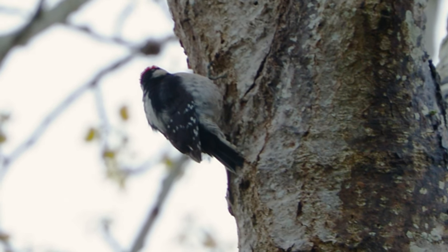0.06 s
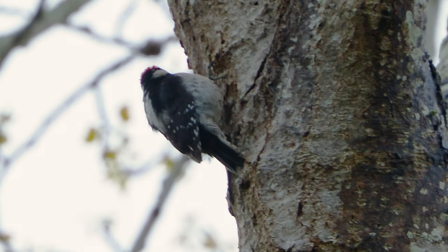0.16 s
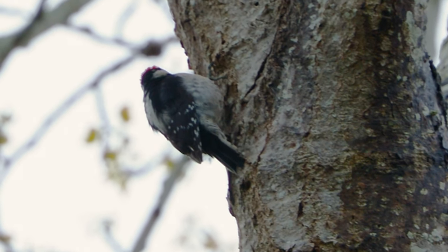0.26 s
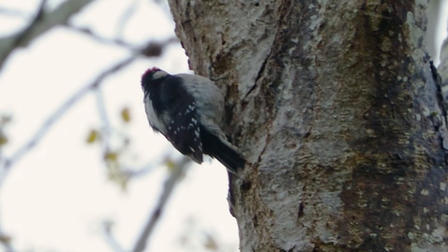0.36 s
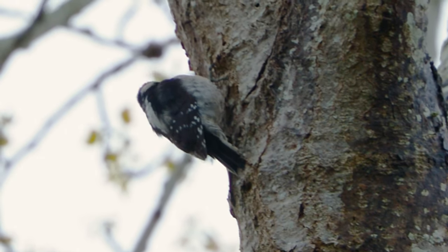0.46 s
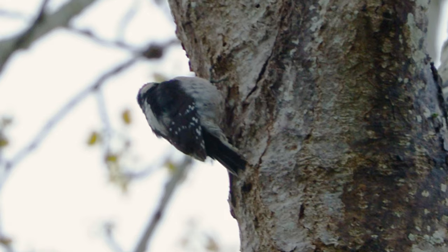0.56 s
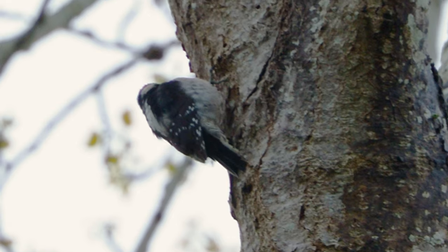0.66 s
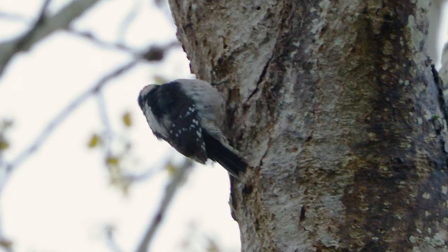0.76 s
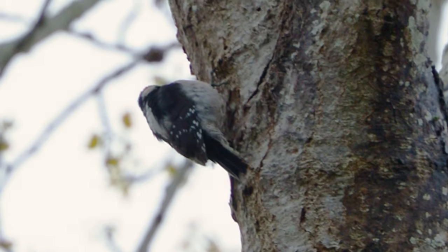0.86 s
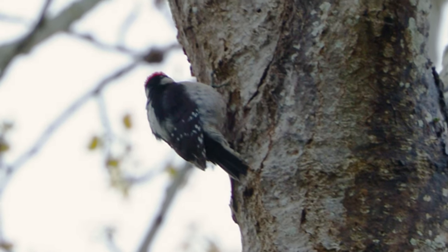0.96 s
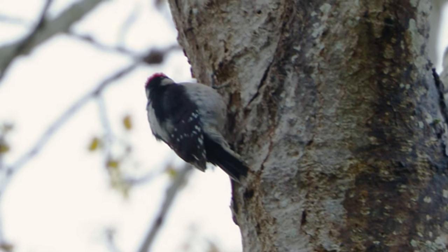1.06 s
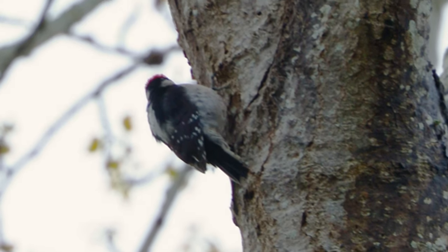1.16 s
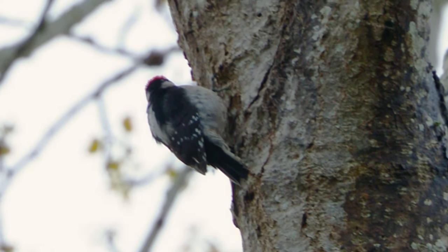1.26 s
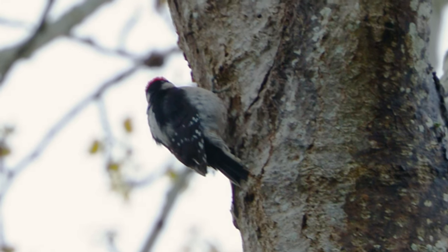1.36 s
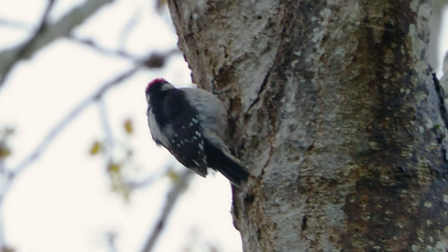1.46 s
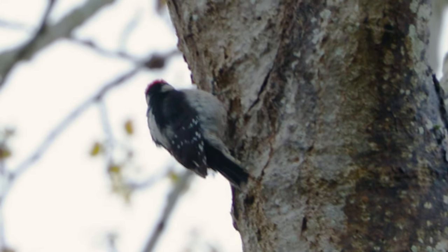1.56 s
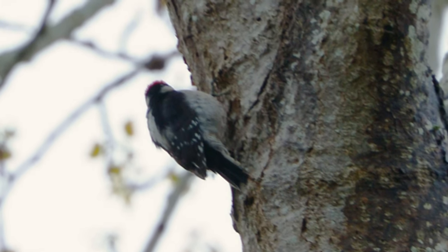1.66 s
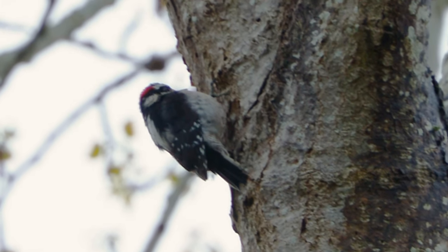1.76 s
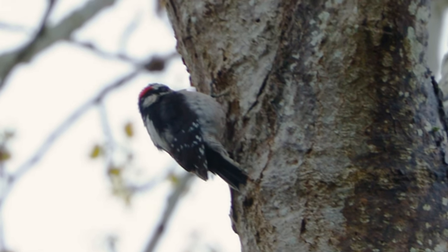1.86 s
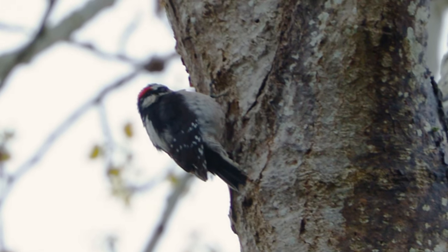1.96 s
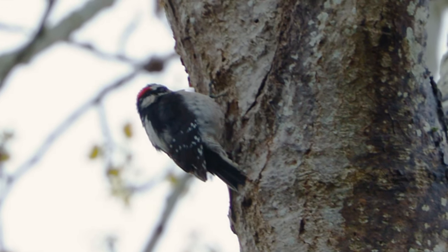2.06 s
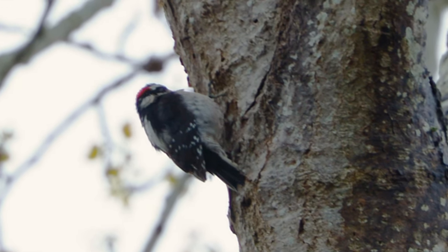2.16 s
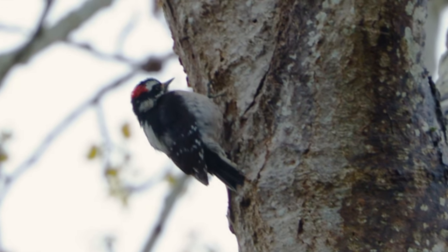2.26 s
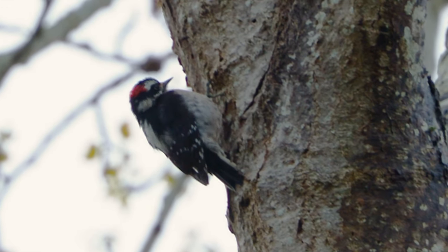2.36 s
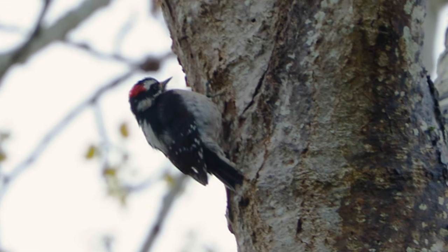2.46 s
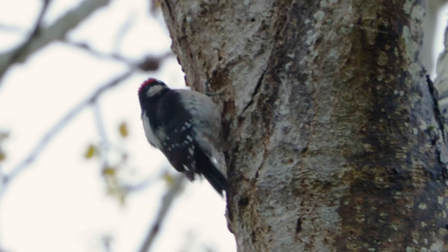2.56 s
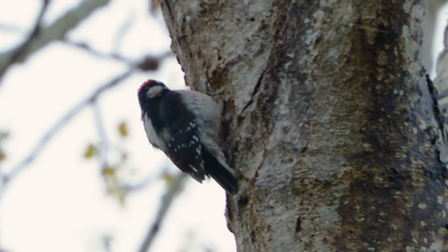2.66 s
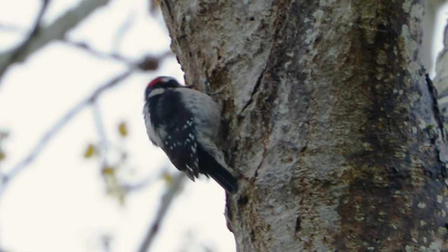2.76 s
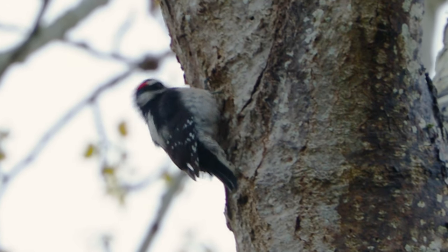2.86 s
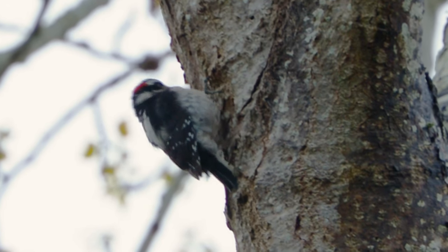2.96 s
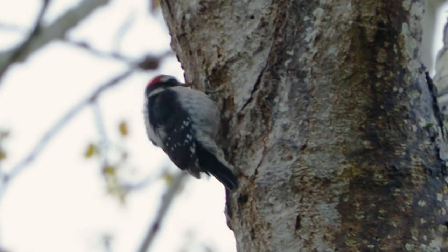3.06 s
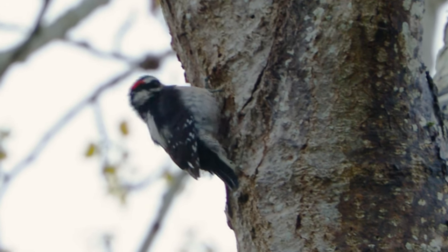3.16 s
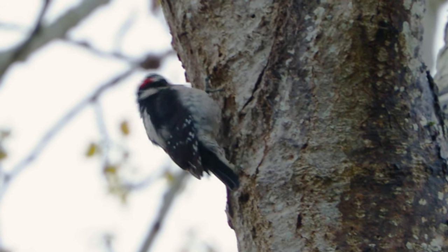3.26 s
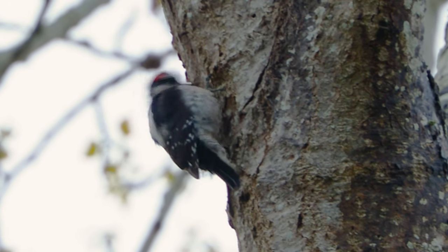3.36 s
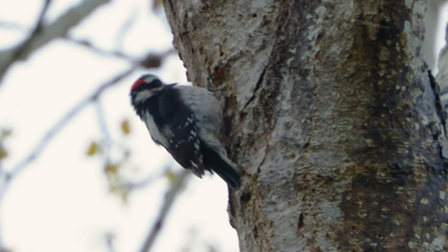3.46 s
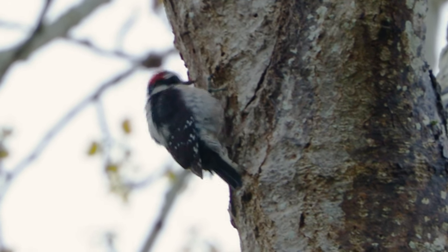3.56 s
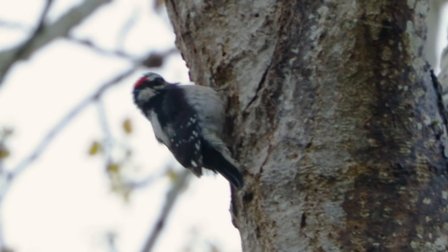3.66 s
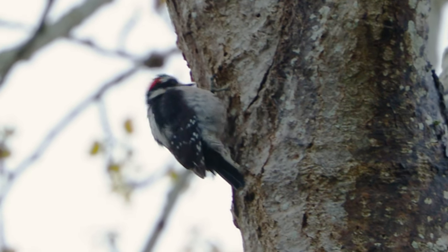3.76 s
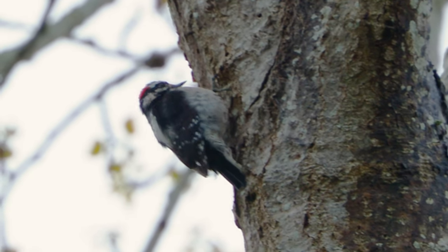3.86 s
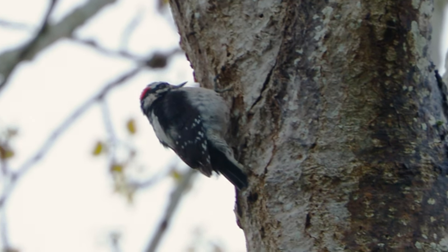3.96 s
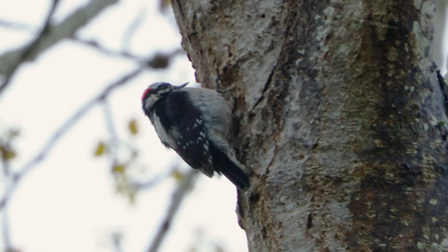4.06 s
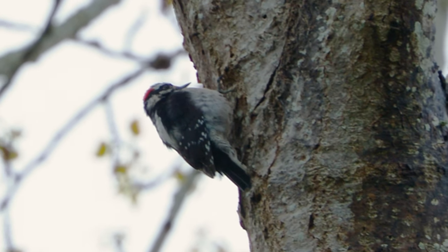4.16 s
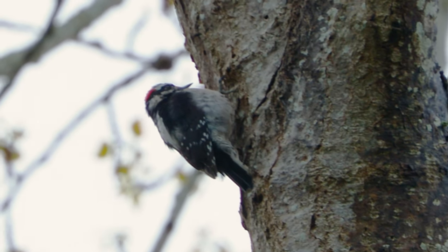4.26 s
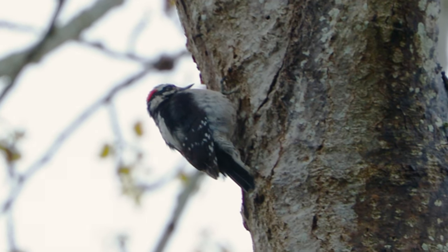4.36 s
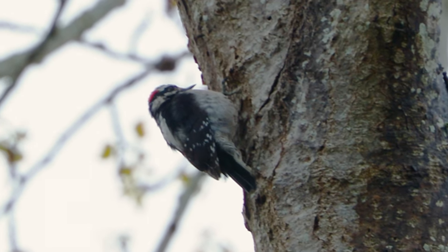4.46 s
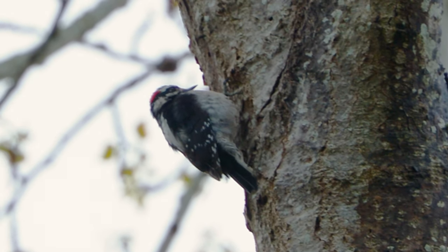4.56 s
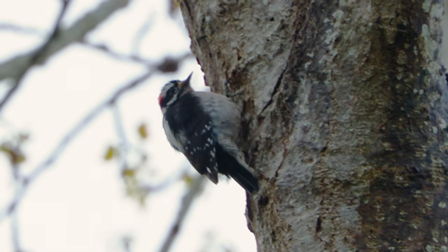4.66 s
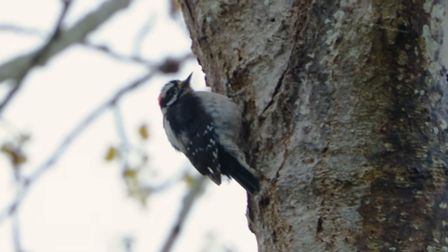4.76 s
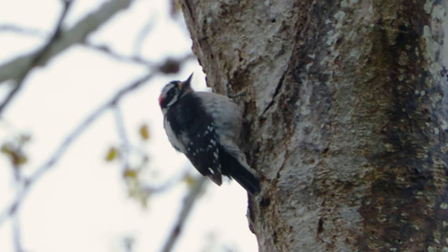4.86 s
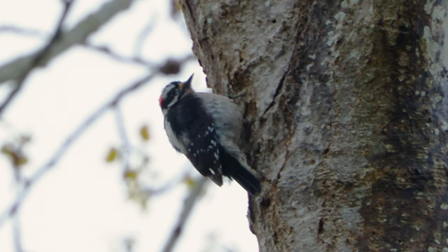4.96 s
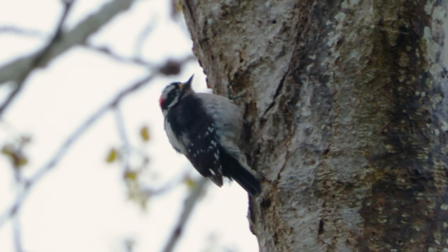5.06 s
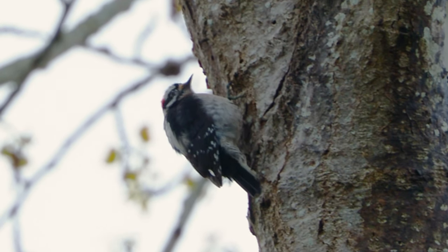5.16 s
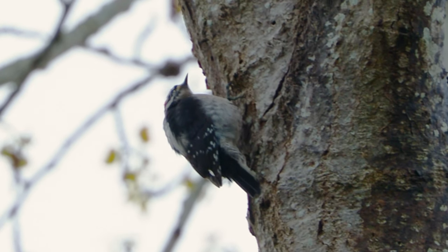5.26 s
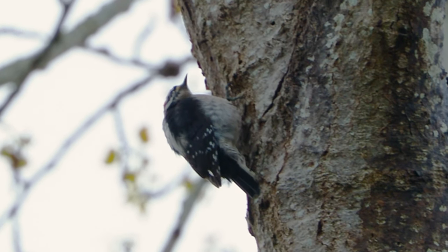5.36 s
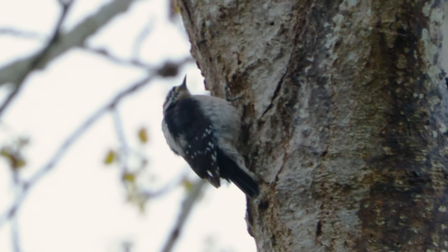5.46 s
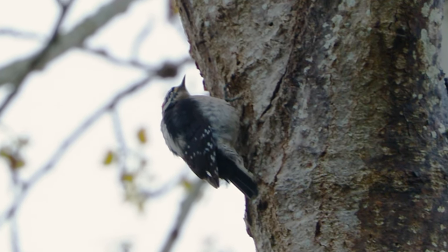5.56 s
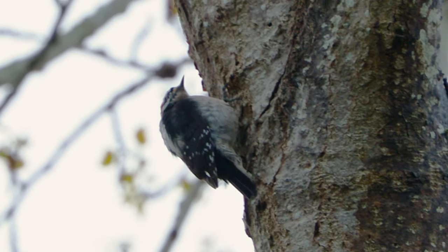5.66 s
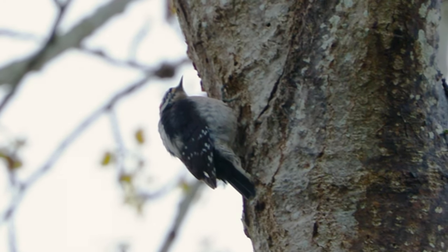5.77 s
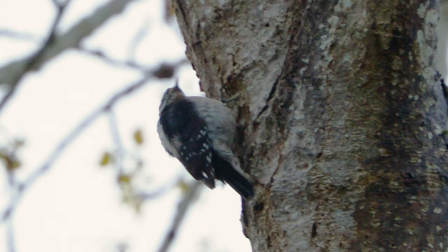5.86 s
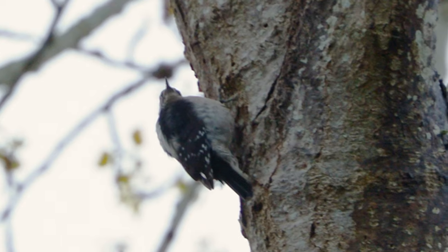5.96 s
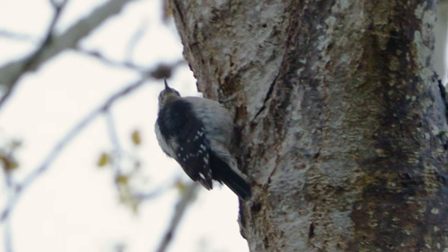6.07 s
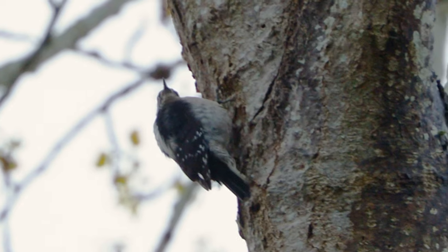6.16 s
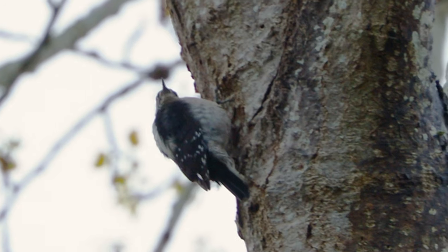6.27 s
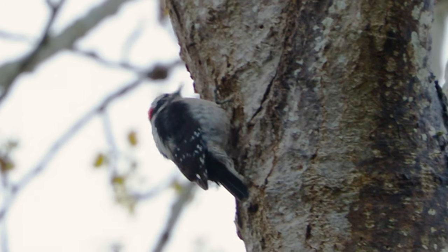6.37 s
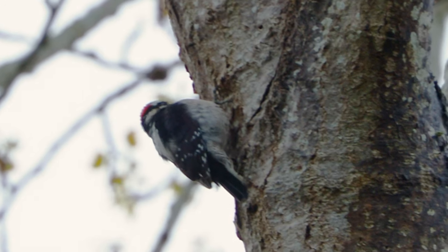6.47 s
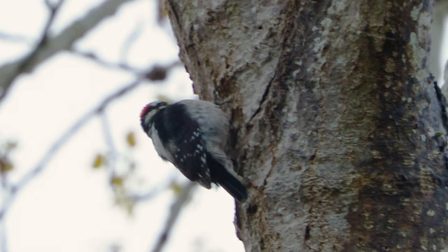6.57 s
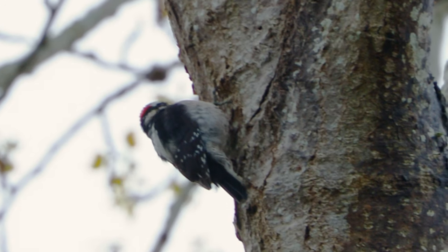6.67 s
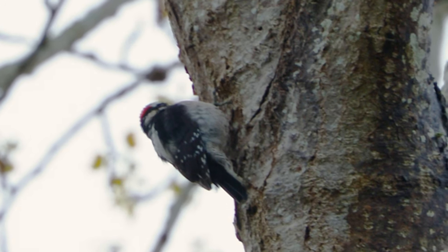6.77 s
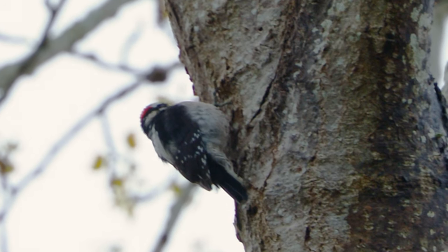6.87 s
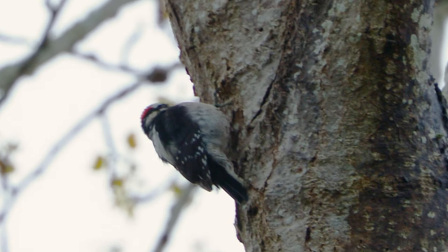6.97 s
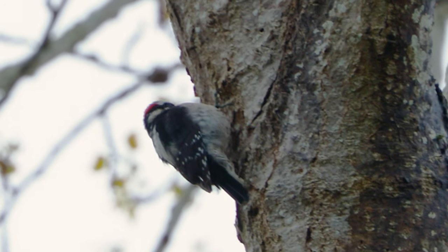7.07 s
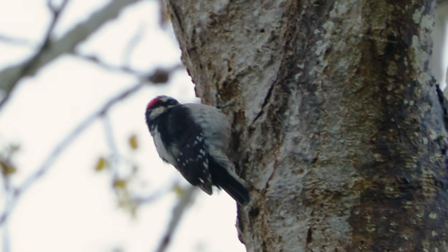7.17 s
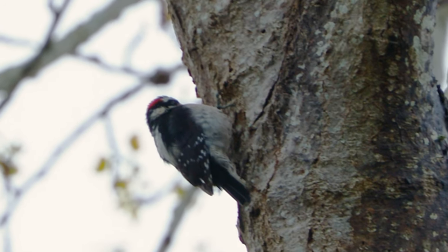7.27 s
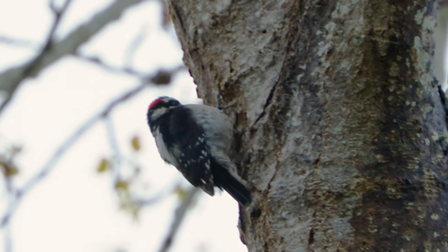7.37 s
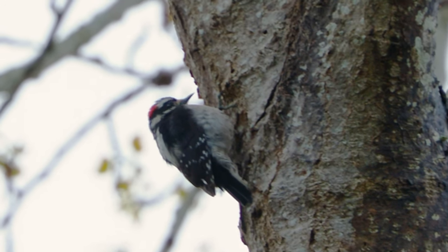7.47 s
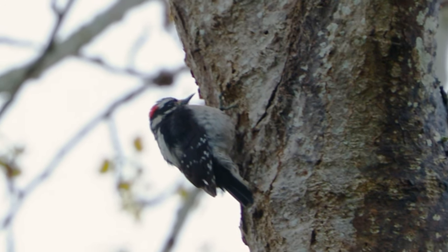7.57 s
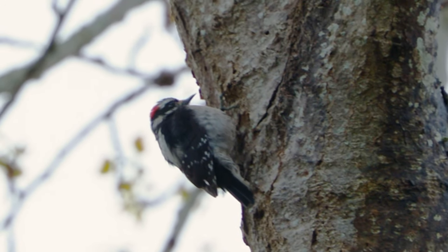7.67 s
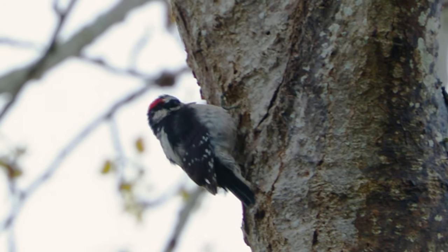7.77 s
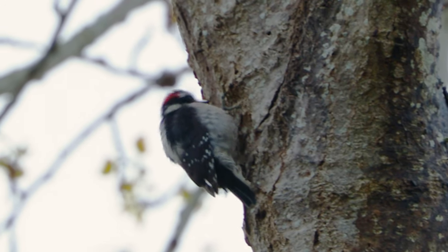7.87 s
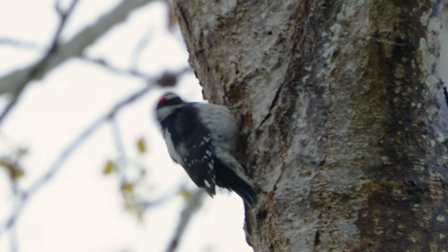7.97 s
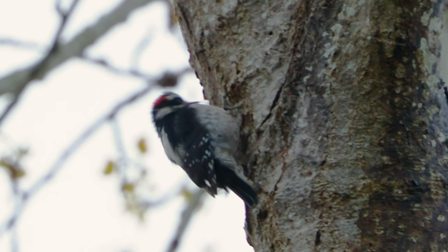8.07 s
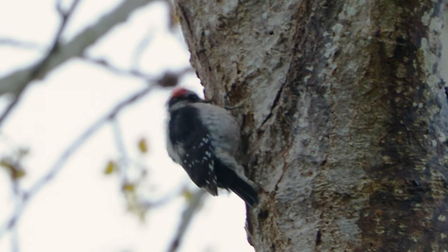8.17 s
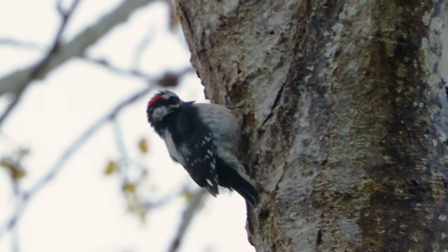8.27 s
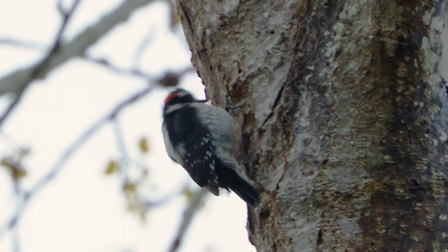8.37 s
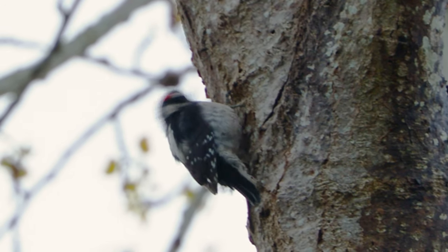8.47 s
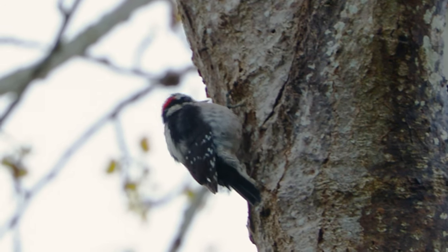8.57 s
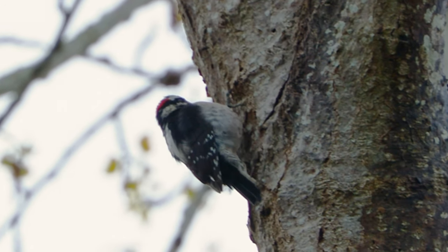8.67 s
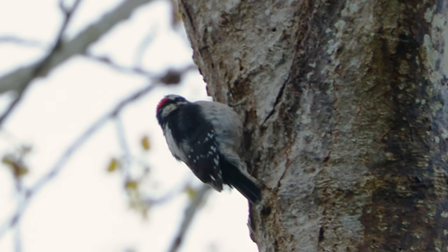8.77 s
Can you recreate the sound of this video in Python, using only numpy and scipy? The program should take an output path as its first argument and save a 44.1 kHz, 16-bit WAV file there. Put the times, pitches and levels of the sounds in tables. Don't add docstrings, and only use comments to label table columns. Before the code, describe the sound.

A woodpecker drums two fast hollow rolls on a tree trunk while small birds chip, whistle and buzz over low distant traffic rumble.

```python
import sys
import numpy as np
from scipy import signal
from scipy.fft import rfft, irfft, next_fast_len
from scipy.io import wavfile
from scipy.ndimage import uniform_filter1d

SR = 44100
rng = np.random.default_rng(int(sys.argv[2]) if len(sys.argv) > 2 else 0)


def gain_from_db(level_db):
    decades = np.asarray(level_db, float) / 20
    return 10 ** decades


def wav_out(sig):
    wavfile.write(sys.argv[1], SR, np.round(np.clip(np.atleast_2d(sig).T, -1, 1) * 32767).astype(np.int16))


N = 388521


def curve(table, hz):
    f, v = np.transpose(table)
    return np.interp(np.log(hz + 1), np.log(f), v)


def walk(rate):
    hold = int(SR / rate)
    steps = np.repeat(rng.standard_normal(N // hold + 1), hold)
    return 1.4 * uniform_filter1d(uniform_filter1d(steps, hold), hold)[:N]


def add(out, s, sound):
    i = int(s * SR)
    out[i:i + len(sound)] += sound[:max(N - i, 0)]


def swell(n, edge):
    return signal.windows.tukey(n, np.clip(edge, 0, 1))


def modes(table, n):
    t = np.arange(n) / SR
    return np.array([gain_from_db(db) * np.exp(-np.log(1000) * t / t60) * np.sin(2 * np.pi * hz * t)
                     for hz, db, t60, *_ in table])


def wood(x, t60, wet_db, left_db, lag):
    t = np.arange(SR // 3) / SR
    both, left, right = rng.standard_normal((3, len(t)))
    sides = np.array([left, right])
    low = signal.butter(2, 1600, fs=SR, output="sos")
    scatter = sides + signal.sosfilt(low, both - sides)
    scatter *= np.exp(-np.log(1000) * t / t60) * np.clip(t / 0.0015, 0, 1)
    scatter *= gain_from_db(wet_db) / np.sqrt(np.sum(scatter[0] ** 2))
    direct = np.array([gain_from_db(left_db / 2) * np.roll(x, lag), gain_from_db(-left_db / 2) * x])
    return direct + signal.oaconvolve(x[None], scatter, axes=1)[:, :N]


def slurs(notes, edge, flutter):
    out = np.zeros(N)
    for s, length, from_hz, to_hz, bend, db in notes:
        u = np.linspace(0, 1, int(length * SR))
        hz = to_hz + (from_hz - to_hz) * (1 - u) ** bend
        add(out, s, gain_from_db(db) * swell(len(u), edge) * np.sin(2 * np.pi * np.cumsum(hz) / SR))
    return np.sqrt(2) * out * (1 + flutter * walk(300))


# f/Hz, level/dB per Hz
AIR_SPECTRUM = [(25, -5), (49, 0), (85, -2), (169, -16.5), (305, -17), (480, -21.5), (684, -21),
                (1050, -22), (1900, -42), (2700, -37), (4300, -43.5), (5600, -47), (8200, -51.5),
                (15500, -54.5)]
# f/Hz, share 0-1
PORT_LIKENESS = [(60, 0.99), (130, 1), (290, 0.87), (640, 0.9), (1410, 1), (3100, 0.38), (6800, 0.04),
                 (15000, 0.02)]
# t/s, level/dB
PASSING_VEHICLE = [
    (0.0, -44),
    (2.13, -41.5),
    (2.45, -39),
    (3.83, -45.5),
    (4.86, -45),
    (6.89, -47.5),
    (8.81, -46),
]


def traffic():
    top_hz, hum_share = 15800, 0.69
    size = next_fast_len(N)
    hz, t = np.fft.rfftfreq(size, 1 / SR), np.arange(N) / SR
    both, left, right = rfft(rng.standard_normal((3, size)))
    share = np.clip(curve(PORT_LIKENESS, hz), 0, 1)
    late = np.exp(-2j * np.pi * hz * 5.5 / SR)
    common = np.sqrt(share) * np.array([both * late, both])
    separate = np.sqrt(1 - share) * np.array([left, right])
    ports = (hz < top_hz) * gain_from_db(curve(AIR_SPECTRUM, hz)) * (common + separate)
    s, db = np.transpose(PASSING_VEHICLE)
    near_db = np.interp(t, s, db - np.median(db))
    surge_db = .5 * walk(3.016)
    out = 0
    for centre in 2 ** np.arange(4.5, 14.1, .5):
        part = np.clip(1 - 2 * abs(np.log2((hz + 1) / centre)), 0, 1)
        if centre < 130:
            rise = surge_db
        elif centre < 600:
            rise = near_db
        else:
            rise = hum_share * near_db * (centre < 1600)
        out = out + irfft(ports * part, size)[:, :N] * gain_from_db(rise + 1.45 * walk(5))
    return out * gain_from_db(-34.5) / np.std(out)


# t/s, level/dB, top level/dB
CAMERA_TICKS = [
    (0.1047, -51, -3),
    (2.5765, -51, -26),
    (3.7444, -45.5, 2),
    (4.62, -48, -21),
    (4.6644, -56, -5),
    (5.346, -56, -25),
    (5.7833, -50, -33),
    (7.476, -60, -26),
    (7.8044, -51, -29),
]


def camera():
    out, t = np.zeros((2, N)), np.arange(300) / SR
    body_band = signal.butter(1, [6500, 11000], "band", fs=SR, output="sos")
    top_band = signal.butter(2, [14500, 16300], "band", fs=SR, output="sos")
    for s, db, top_db in CAMERA_TICKS:
        tick = rng.standard_normal((2, 300)) * np.exp(-t / 0.0019) * np.clip(t / 0.00044, 0, 1)
        body, top = signal.sosfilt(body_band, tick), signal.sosfilt(top_band, tick)
        add(out.T, s, (gain_from_db(db + 9.0) * body + gain_from_db(db + top_db + 16) * top).T)
    return out


# voiced from t/s, crest t/s, crest f/Hz, level/dB, hoarseness 0-1
MEW_CALLS = [
    (.4, .78, 1325, -57.5, .05),
    (3.98, 4.285, 1295, -55, .8),
    (7.66, 7.62, 1335, -65, .5),
    (8.66, 8.87, 1310, -54.5, .05),
]
# multiple of the pitch, level/dB
MEW_HARMONICS = [
    (2, -5),
    (3, 0),
    (4, -15),
]
# t/s from its crest, pitch as share of the crest, level/dB
MEW_ARC = [
    (-.38, .71, -11),
    (-.27, .77, -5),
    (-.18, .85, -4),
    (-.11, .935, -1),
    (0, 1, 0),
    (.17, .975, -4),
    (.26, .96, -15),
]


def mewing():
    out, t = np.zeros(N), np.arange(N) / SR
    s, share, arc_db = np.transpose(MEW_ARC)
    (low, low_db), *upper = MEW_HARMONICS
    for start, crest, crest_hz, db, hoarse in MEW_CALLS:
        pitch = crest_hz * np.interp(t - crest, s, share)
        jitter = (.003 + .009 * hoarse) * walk(150)
        phase = 2 * np.pi * np.cumsum(pitch * (1 + jitter)) / SR
        octave = gain_from_db(low_db) * np.clip((pitch - 1150) / 90, 0, 1) * np.sin(low * phase)
        whole = 1 - hoarse * np.clip(1 + (t - crest) / .1, 0, 1)
        strands = whole + .95 * np.sin(phase / 6.3) + .4 * hoarse * np.sin(phase / 2.1)
        nasal = sum(gain_from_db(order_db) * np.sin(k * phase) for k, order_db in upper)
        level = gain_from_db(db + np.interp(t - crest, s, arc_db, -90, -90))
        out += level * np.clip((t - start) / .03, 0, 1) * (octave + nasal * strands)
    return wood(out * (1 + .35 * walk(60)), .5, -1, 1.5, lag=2)


# t/s, length t/s, end f/Hz, level/dB
FALLING_CHIPS = [(.858, .05, 8000, -68), (1.335, .06, 7900, -63), (1.7, .06, 7900, -62),
                 (2.01, .065, 7300, -61), (2.315, .065, 7600, -61), (2.33, .045, 8400, -66),
                 (3.515, .08, 7500, -63), (4.79, .04, 8200, -71), (5.07, .05, 8100, -62),
                 (5.36, .035, 8000, -65), (5.385, .05, 7600, -66), (5.655, .07, 8000, -62),
                 (5.83, .05, 8200, -65)]
# t/s, length t/s, f/Hz, level/dB
HELD_WHISTLES = [
    (1.565, .025, 4700, -66),
    (1.645, .028, 4550, -65),
    (2.33, .18, 4550, -67),
    (2.42, .14, 4900, -71),
    (2.2, .3, 4100, -76),
    (7.63, .65, 5500, -75),
    (8.35, .3, 5050, -75),
]
# t/s, length t/s, from f/Hz, to f/Hz, level/dB
GLIDING_WHISTLES = [
    (1.95, .13, 4650, 4550, -68),
    (1.98, .045, 5700, 6150, -67),
    (2.6, .03, 8300, 7900, -70),
    (2.67, .03, 8300, 7900, -70),
    (2.72, .05, 4100, 3600, -68),
    (2.75, .05, 6500, 6000, -65),
    (2.79, .07, 6250, 6200, -68),
    (2.85, .02, 3800, 3500, -65),
    (3.81, .07, 6000, 6800, -68),
]
# t/s, length t/s, f/Hz, level/dB
LOW_CHUCKS = [
    (4.212, 0.024, 2790, -59),
    (4.904, .018, 1980, -57),
    (5.272, 0.017, 1994, -52),
    (5.45, .013, 1720, -54),
    (5.702, .015, 1975, -61),
    (6.068, .015, 1990, -63),
    (6.427, 0.022, 2100, -67),
]
# t/s, length t/s, end f/Hz, level/dB
SHALLOW_CHIPS = [
    (6.705, .04, 7800, -65),
    (7.54, .035, 8000, -72),
    (7.74, .11, 7250, -63),
    (7.985, .04, 7750, -69),
]


def small_birds():
    straight_s = .023
    chuck_rise = 0.036
    chips = [(s, length, 9100, hz, length / straight_s, db) for s, length, hz, db in FALLING_CHIPS]
    chips += [(s, length, hz + 630, hz, length / straight_s, db) for s, length, hz, db in SHALLOW_CHIPS]
    whistles = [(s, length, hz, hz, 1, db) for s, length, hz, db in HELD_WHISTLES]
    whistles += [(*row[:4], 1.3, row[4]) for row in GLIDING_WHISTLES]
    chucks = [(s, length, hz * (1 - chuck_rise), hz * (1 + chuck_rise), 1, db)
              for s, length, hz, db in LOW_CHUCKS]
    overhead = gain_from_db(.5) * wood(slurs(chips, .3, .15), .4, -4, -1.5, lag=-1)
    whistling = gain_from_db(1.5) * wood(slurs(whistles, .4, .5), .3, -6, 1.5, lag=1)
    chucking = wood(slurs(chucks, .7, .5), .15, -4, .5, lag=2)
    return overhead + whistling + chucking


# t/s, length t/s, centre f/Hz, spread f/Hz, level/dB
BUZZY_TRILLS = [
    (1.55, 0.05, 5960, 300, -64),
    (2.879, .58, 7070, 350, -69.5),
    (5.2, .62, 5580, 587, -61),
    (6.015, 0.12, 6300, 400, -56.5),
    (6.18, 0.46, 7180, 248, -62),
    (8.09, 0.073, 5970, 296, -61.5),
    (8.45, .4, 6870, 200, -68.5),
]
# t/s, length t/s, from f/Hz, to f/Hz, level/dB
OPENING_NOTES = [
    (4.875, .06, 5400, 6750, -64),
    (4.915, .26, 6550, 7550, -59),
    (5.708, .016, 3050, 3000, -54),
    (5.708, .016, 6100, 6000, -58),
    (5.808, .15, 3300, 3980, -50),
]
# t/s, level/dB
FALL_AND_TRILL = [
    (6.035, -51.5),
    (6.261, -51),
    (6.487, -51.5),
    (6.705, -51),
]


def sparrow():
    notes = [(s, length, from_hz, to_hz, 1.6, db) for s, length, from_hz, to_hz, db in OPENING_NOTES]
    notes += [(s, .108, 7200, 4780, 1.25, db) for s, db in FALL_AND_TRILL]
    trill = [(s + .105, db + 5) for s, db in FALL_AND_TRILL]
    notes += [(s, .04, 3230, 3420, .7, db - 3) for s, db in trill]
    notes += [(s + .027, .016, 3350, 3600, 1.1, db) for s, db in trill]
    notes += [(s + .048, .014, 3150, 2950, 1.5, db - 8) for s, db in trill]
    ticks_from_s, tick_gap_s, tick_db, start_db = 5.231, .0583, -64.5, -4
    notes += [(ticks_from_s + k * tick_gap_s, .012, 8000, 6400, 1.1, tick_db + start_db / 2 ** k)
              for k in range(10)]
    buzz = np.zeros(N)
    vibrato_hz = 110 + 25 * walk(40)
    wobble = np.sin(2 * np.pi * np.cumsum(vibrato_hz) / SR) + 0.55 * walk(400)
    for s, length, hz, spread_hz, db in BUZZY_TRILLS:
        w = wobble[int(s * SR):int((s + length) * SR)]
        tone = np.sin(2 * np.pi * np.cumsum(hz + spread_hz * w) / SR)
        add(buzz, s, 1.36 * gain_from_db(db) * swell(len(w), 0.14) * tone)
    song = slurs(notes, .35, .25)
    return gain_from_db(3.0) * wood(song, 0.55, -2.7, -6.0, lag=-4) + wood(buzz, 0.76, 1.3, -6.5, lag=-5.5)


# first blow t/s, blows, first gap t/s, each gap longer by t/s
DRUM_ROLLS = [
    (2.9086, 18, .05966, .000285),
    (7.9487, 13, .06097, .000205),
]


def blow_rows():
    uneven_ms, uneven_db = .3, .35
    rows = []
    for start, count, gap, longer in DRUM_ROLLS:
        k, chance = np.arange(count), rng.standard_normal((count, 2)).T
        s = start + gap * k + longer * k * (k - 1) / 2 + uneven_ms / 1000 * chance[0]
        warm_up_db = -6 * np.exp(-k / 1.3)
        tire_db = -3.5 * np.exp((k + 1 - count) / 1.3)
        rows += zip(s, 1.33 + warm_up_db + tire_db + uneven_db * chance[1])
    return rows


# f/Hz, level/dB, t60 t/s, side of the bark that moves out first
TRUNK_MODES = [(735, -25.3, 0.0162, -1), (953, -29.0, 0.0741, 1), (1001, -19.5, 0.0508, 1),
               (1373, -21.5, 0.0063, -1), (1728, -48.3, 0.0263, -1), (1995, -30.0, 0.0114, -1),
               (2341, -27.8, 0.0114, 1), (3059, -12.4, 0.0069, 1), (3067, -12.1, 0.0052, -1),
               (5264, -58.8, 0.029, 1)]
# f/Hz, level/dB, t60 t/s
BARK_MODES = [(2665, -44.5, 0.014), (2830, -50, 0.02), (2990, -44.5, 0.029), (4450, -43.5, 0.0065),
              (5060, -41.5, 0.0091), (7050, -57, 0.0073), (9850, -48, 0.0082)]
# arrival t/ms, left late by samples, left gain, right gain
ECHO_PATHS = [(0.59, 1.5, 0.85, 1.0), (8.47, 2.2, 0.74, 0.85), (12.84, 0.4, 0.26, 0.24),
              (17.04, 0.2, -0.11, 0.03), (20.94, 0.0, 0.06, -0.01), (26.09, 0.7, 0.18, 0.2),
              (32.16, 1.0, 0.11, 0.13), (36.69, -0.4, 0.07, 0.09), (40.53, -0.1, 0.02, 0.05),
              (43.65, -0.4, 0.09, 0.06)]


def drumming():
    blows, cracks, heard = np.zeros(N), np.zeros(N), np.zeros((2, 6000))
    trunk = TRUNK_MODES[:-1]
    ring = np.array(trunk)[:, 3] @ modes(trunk, n=6000)
    ring = ring + np.roll(modes(BARK_MODES, n=6000).sum(0), 30)
    dull = signal.lfilter([.141], [1, -.859], ring)
    dull *= 0.68 + 0.52 / (1 + (np.arange(6000) / SR / 0.0019) ** 4)
    for k, (lag_ms, late, left, right) in enumerate(ECHO_PATHS):
        sound = np.roll(dull if k else ring, round((lag_ms - .5) * SR / 1000))
        heard += np.array([left * np.roll(sound, round(late)), right * sound])
    crack_decay = np.exp(-np.arange(400) / SR / 0.0023)
    for s, db in blow_rows():
        blows[round(s * SR)] = gain_from_db(db)
        add(cracks, s, gain_from_db(-51.5 + 2 * db) * rng.standard_normal(400) * crack_decay)
    cracks = signal.sosfilt(signal.butter(2, [3500, 10500], "band", fs=SR, output="sos"), cracks)
    bright_start = np.diff(ring[:90] * np.hanning(180)[90:], prepend=0)
    knock = signal.fftconvolve(blows, bright_start)[:N]
    knock = signal.sosfilt(signal.butter(2, 2900, fs=SR, output="sos"), knock)
    thud = signal.fftconvolve(blows, ring[:260] * np.hanning(520)[260:])[:N]
    far = gain_from_db(9.5) * (wood(knock, 0.23, 0, 0, lag=0) - knock)
    far += gain_from_db(-10) * (wood(thud, 0.67, 0, 0, lag=0) - thud)
    near = signal.fftconvolve(blows[None], heard, axes=1)[:, :N]
    roll = near + far + wood(cracks, .3, 3, -2.5, lag=1.8)
    return signal.sosfilt(signal.butter(4, 11500, fs=SR, output="sos"), roll)


# t/s, level/dB
TWIG_SNAPS = [
    (4.559, -36.5),
    (4.605, -46),
]
# f/Hz, level/dB, t60 t/s
TWIG_MODES = [(1720, -2, .022), (2350, 0, .03), (2650, -3, .015), (3050, -4, .02), (3500, -8, .015)]


def twig():
    out = np.zeros(N)
    for s, db in TWIG_SNAPS:
        force = rng.uniform(0.47, 1, len(TWIG_MODES))
        add(out, s, gain_from_db(db) * force @ modes(TWIG_MODES, n=3000))
    return wood(out * (1 + .3 * walk(900)), 0.23, -2, .5, lag=2.2)


def scene():
    return traffic() + camera() + mewing() + small_birds() + gain_from_db(-0.36) * sparrow() + drumming() + twig()


def band_limit(x):
    return signal.sosfilt(signal.butter(12, 16800, fs=SR, output="sos"), x)


def record(dry):
    heard = dry - .5 * signal.lfilter(*signal.iirpeak(11200, 9, fs=SR), dry)
    return band_limit(heard)


dry = scene()
out = record(dry)
wav_out(out)
```